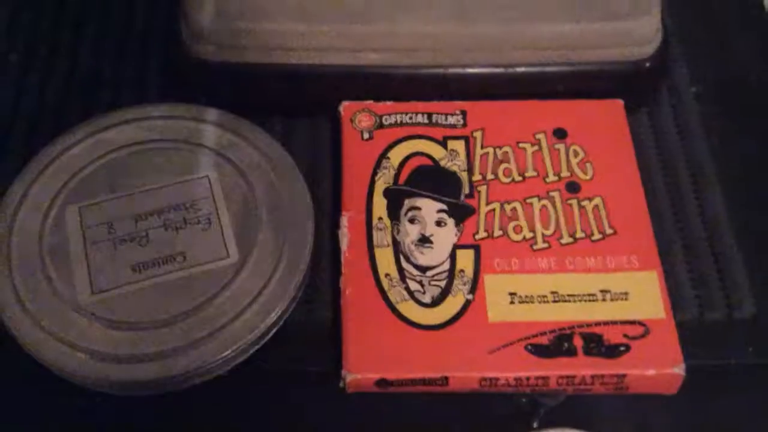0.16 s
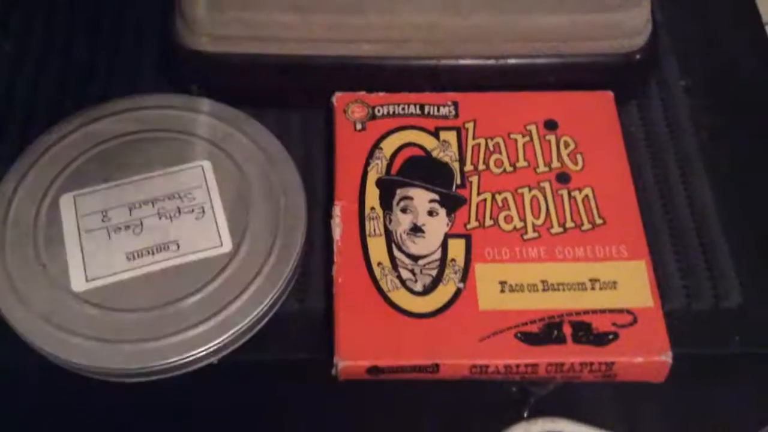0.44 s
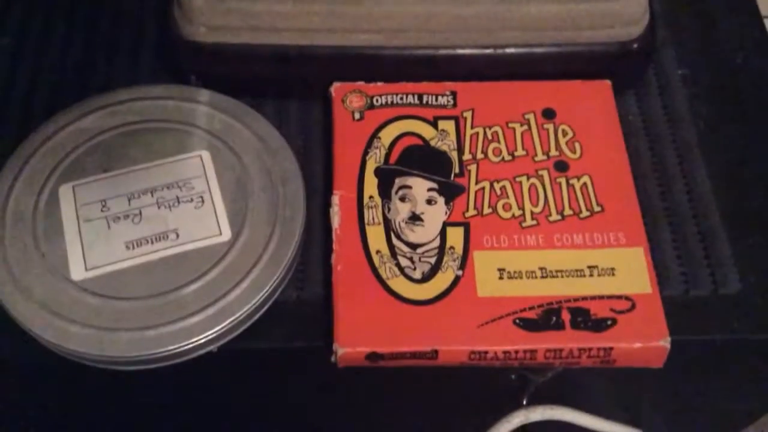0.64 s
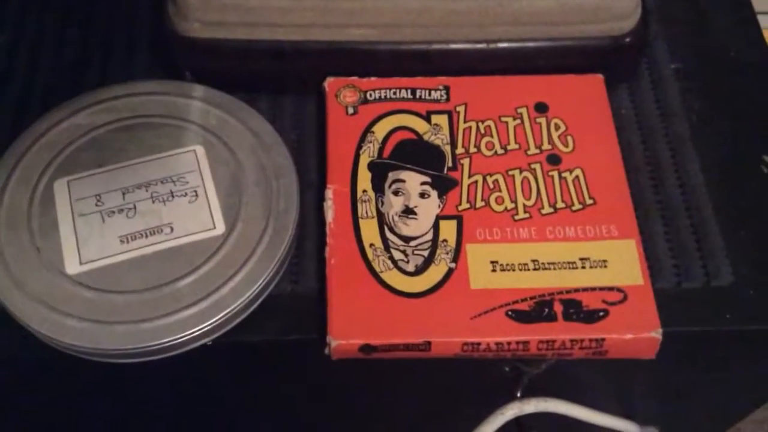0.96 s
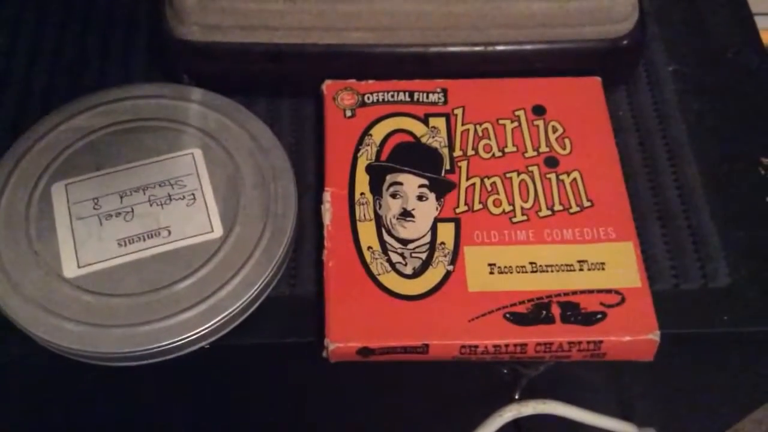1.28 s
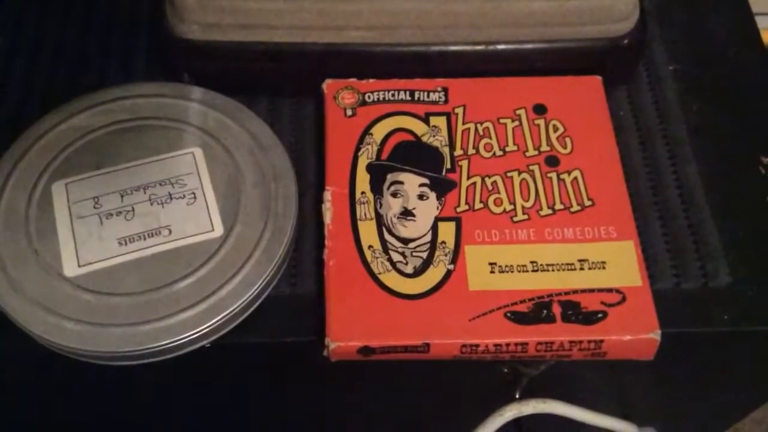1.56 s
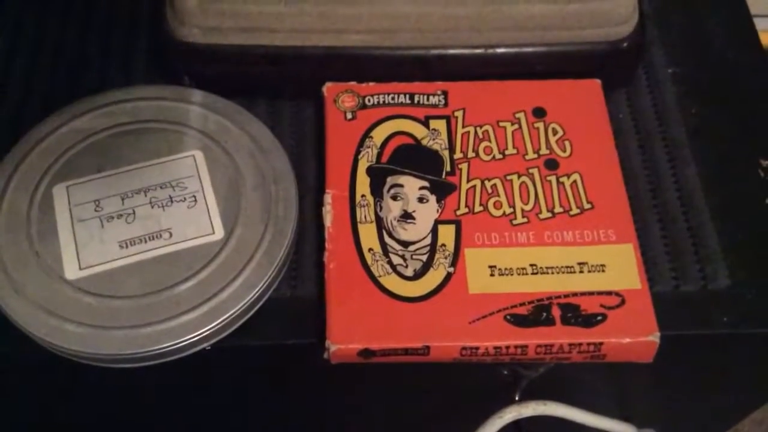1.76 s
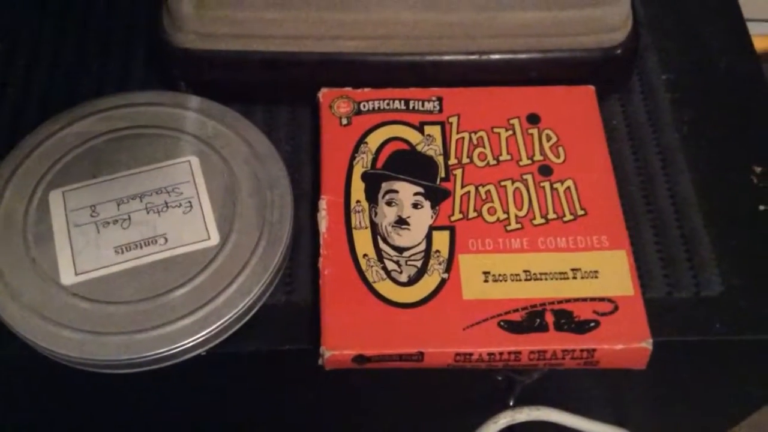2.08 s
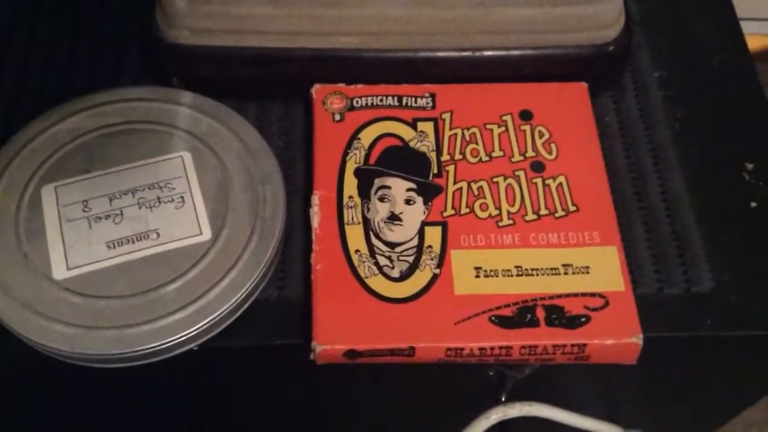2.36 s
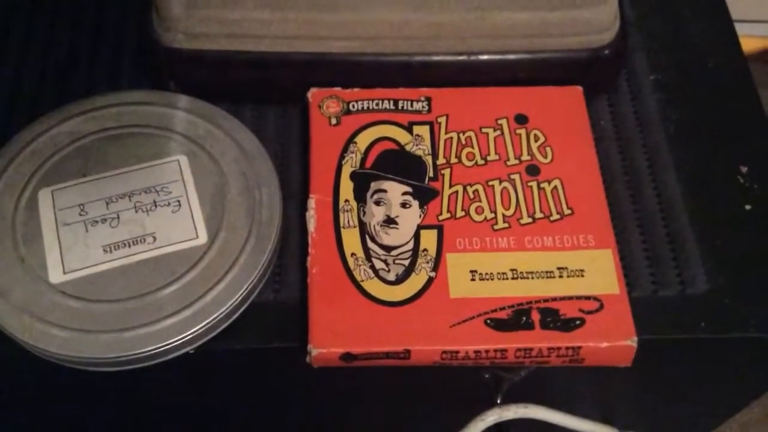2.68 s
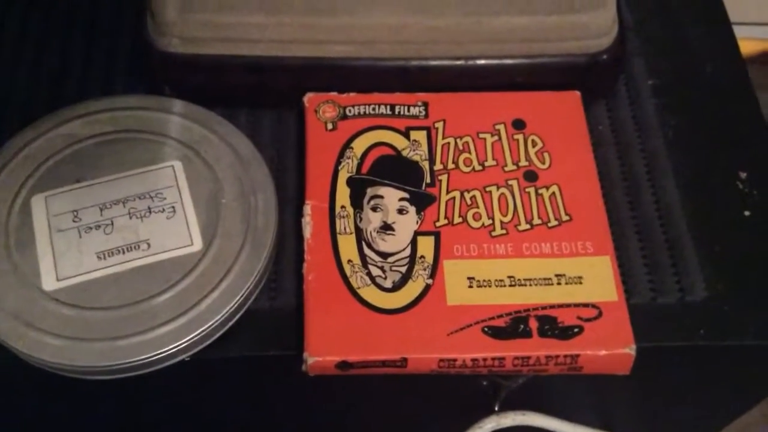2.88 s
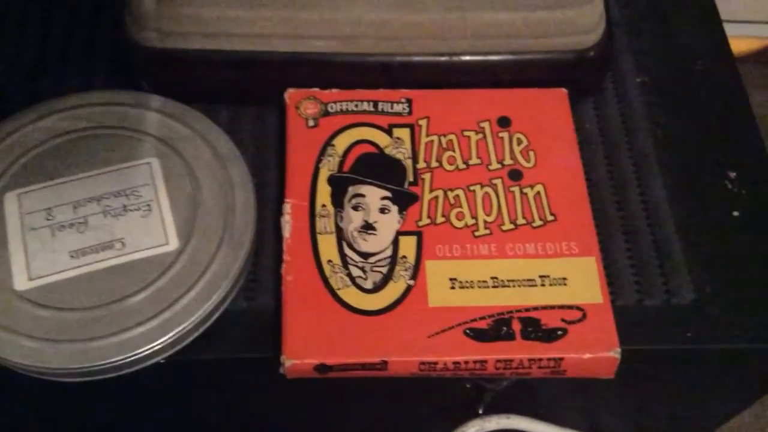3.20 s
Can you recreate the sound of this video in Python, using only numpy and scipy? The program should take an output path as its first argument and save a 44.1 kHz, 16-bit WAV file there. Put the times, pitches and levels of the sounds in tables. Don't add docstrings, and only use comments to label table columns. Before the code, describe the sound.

Rapid, steady metallic clatter of a film projector, with faint gear whine and blower air behind.

```python
import sys
import numpy as np
from scipy import signal
from scipy.fft import rfft, irfft
from scipy.io import wavfile
from scipy.ndimage import uniform_filter1d

SR = 44100
rng = np.random.default_rng(int(sys.argv[2]) if len(sys.argv) > 2 else 0)


def inscribe(sig):
    pcm = np.round(np.clip(np.atleast_2d(sig).T, -1, 1) * 32767)
    wavfile.write(sys.argv[1], SR, pcm.astype(np.int16))


def volts(x):
    e = np.asarray(x, float) / 20
    return 10 ** e


N = 147294

# t/s, film frames pulled so far
SHAFT_TURN = [(0.1351, 0), (0.339, 5), (0.5434, 10), (0.7471, 15), (0.951, 20), (1.1548, 25), (1.3571, 30),
              (1.5589, 35), (1.7618, 40), (1.9642, 45), (2.1671, 50), (2.3707, 55), (2.5747, 60),
              (2.7779, 65), (2.9811, 70), (3.1845, 75), (3.306, 78)]
# t/s, level/dB
CLAW_FORCE = [(.13, -32), (.3, -36.5), (.55, -35), (1.0, -36.5), (1.3, -35.5), (1.46, -38), (1.65, -37.5),
              (1.82, -33.5), (2.05, -36.5), (2.3, -35), (2.6, -34.5), (2.9, -36), (3.15, -33.5), (3.3, -33)]
# f/Hz, level/dB, time to fall 60 dB/s, delay/s
CLAW_MODES = [(9300, 2, .0047, 0), (9800, -3, .0035, 0), (8350, -6, .011, .0002),
              (14800, -12.5, .004, -.0003), (14700, -12.5, .006, .0007), (15600, -13.5, .005, .0005),
              (12800, -15, .005, -.0003), (16200, -19, .004, 0)]
# f/Hz, level/dB, time to fall 60 dB/s, delay/s
GATE_MODES = [(2950, -6.5, .02, -.0002), (2790, -12, .03, 0), (4000, -9, .013, .0008),
              (4450, -14, .015, .001), (5100, -9.5, .016, .0008), (5950, -12, .013, 0),
              (6600, -15, .011, .0003)]
# f/Hz, level per Hz/dB
RATTLE_COLOUR = [(1500, -6), (2500, 2), (5000, -4), (7500, -1.5), (9500, -2), (12000, -4), (14800, -7),
                 (16800, -7)]
# f/Hz, level/dB, width of wavering/Hz, steady share
STEADY_TONES = [
    (61.3, -61.5, 3, .92),
    (100.1, -70, 1, .9),
    (288.3, -61, 3, .85),
    (503, -65, 4, .7),
    (1878, -65, 6, .6),
    (1992, -65, 8, .6),
]
# f/Hz, level/dB
GEAR_MESH = [(890, -51.5), (816, -60), (914.5, -58), (1036.6, -61), (964, -64), (841, -64)]
# t/s, gear level/dB, fan blade level/dB
WHINE_LOAD = [(.13, -8, -2), (.4, 2.5, -3.5), (.8, 4.5, 1.5), (1.1, -2.5, -5), (1.45, -2, -23),
              (1.75, -3, -6), (2.05, 3.5, -2), (2.5, 1.5, 3.5), (2.8, 1.5, -3), (3.05, 1, -23),
              (3.33, -1.5, 0)]
# f/Hz, level per Hz/dB
RUMBLE_COLOUR = [(15, -48), (25, -33.5), (59, -16), (108, -13.5), (429, -10.5), (579, -8), (728, -8.5),
                 (900, -2.5), (1700, -15.5), (2210, -43), (3740, -120)]
# f/Hz, level per Hz/dB
RUSH_COLOUR = [(880, -18), (1500, -9), (2260, 2.5), (2600, -3), (7620, -12.5), (9500, -15), (12200, -14.5),
               (15100, -14.5), (16500, -43)]
# f/Hz, width/Hz, boost/dB
HOUSING_MODES = [(82, 34, -11), (121, 24, -8.5), (159, 270, 4), (249, 26, -6), (595, 280, 3), (906, 27, 4),
                 (1190, 70, 4), (1888, 190, 5.5), (2267, 27, 7.5), (2740, 40, 5), (4425, 580, 4.5),
                 (7600, 210, -8.5), (11530, 610, 7), (11900, 400, -9)]
# t/s, share
TREBLE_LOSS = [(0, .1), (1.55, .1), (1.7, .42), (2.1, .42), (2.25, .25), (2.65, .35), (3.0, .6),
               (3.34, .45)]
# f/Hz, weight
LOSS_PLACES = [(4800, 0), (5800, .4), (7500, .4), (9000, .15), (11000, .3), (12300, 1), (16000, .8)]


def claw():
    rise_s, rebound_s, rebound_db = .0006, .0122, -22
    usual_db, follow = -33, .5
    turn_s, turn_frame = np.transpose(SHAFT_TURN)
    frame = np.arange(turn_frame[-1] + 1)
    hit_s = np.interp(frame, turn_frame, turn_s) - rise_s
    modes = CLAW_MODES + GATE_MODES
    luck = rng.standard_normal((len(frame), 1 + 2 * len(modes)))
    force_db = np.interp(hit_s, *np.transpose(CLAW_FORCE)) + .8 * luck[:, 0]
    force_db += -1.8 * (frame % 2)
    force_db += -10 * (frame == 35)

    t = np.arange(4000) / SR
    thud = housing_thud(t)
    hz, mode_db, t60, delay = np.transpose(modes)[:, :, None]
    age = np.maximum(t - delay, 0)
    rise = np.sin(np.pi / 2 * np.minimum(age / rise_s, 1)) ** 2
    fall_db = -60 * np.maximum(age - rise_s, 0) / t60

    hits, rattle_starts = np.zeros(N + 4000), np.zeros(N)
    for i, n in enumerate(np.round(hit_s * SR).astype(int)):
        level_luck, pitch_luck = luck[i, 1::2, None], luck[i, 2::2, None]
        change_db = force_db[i] - usual_db
        level_db = usual_db + np.where(hz > 8000, 1, follow) * change_db + mode_db + 1.6 * level_luck
        ringing = np.cos(2 * np.pi * hz * (1 + .006 * pitch_luck) * (age - rise_s))
        snap = (rise * volts(level_db + fall_db) * ringing).sum(0)
        snap = snap + volts(rebound_db) * np.roll(snap, round(rebound_s * SR))
        hits[n:n + 4000] += volts(.5) * snap + volts(-28.5) * thud
        rattle_starts[n] = volts(usual_db + follow * change_db)
    return hits[:N] + rattle(rattle_starts, t)


def housing_thud(t):
    start_s, length_s = .0032, .0083
    progress = np.clip((t - start_s) / length_s, 0, 1)
    swell = volts(-12) * np.sin(np.pi * progress) ** 1.26
    ring = volts(-20 - 60 * t / .14) * progress
    return (swell + ring) * np.sin(2 * np.pi * 1110 * t)


def rattle(starts, t):
    shape = np.minimum(t / .0026, 1) * volts(-10.5 - 60 * t / .13)
    loudness = signal.oaconvolve(starts, shape)[:N]
    return loudness * coloured(lambda f: read(RATTLE_COLOUR, f) + housing_db(f), N)


def whines():
    t = np.arange(N) / SR
    load_s, gear_db, blade_db = np.transpose(WHINE_LOAD)

    def tone(hz, db):
        return volts(db + 2.5) * np.exp(2j * np.pi * (hz * t + rng.random()))

    out = sum(tone(hz, db) * waver(width, steady) for hz, db, width, steady in STEADY_TONES)
    out += volts(np.interp(t, load_s, blade_db)) * tone(576, -54.5) * waver(2.8, 1.0)
    gears = sum(tone(hz, db) for hz, db in GEAR_MESH)
    out += volts(np.interp(t, load_s, gear_db)) * gears * waver(5, .85)
    return out.real


def waver(width_hz, steady):
    noise = rng.standard_normal(N) + 1j * rng.standard_normal(N)
    slowness = 1 + (np.fft.fftfreq(N, 1 / SR) / width_hz) ** 2
    drift = np.fft.ifft(np.fft.fft(noise) / slowness)
    drift = drift / np.sqrt(np.mean(abs(drift) ** 2))
    return steady + np.sqrt(1 - min(steady, 1) ** 2) * drift


def blower():
    rumble_db, rush_db, patchy_db, flicker_db = -44, -47.5, 1.0, 1.28

    def low_colour(f):
        slope = -30 * np.clip(np.log2(f / 1700 + 1e-9), 0, 3)
        return read(RUMBLE_COLOUR, f) + housing_db(f) + slope - 20 * (f < 22)

    def high_colour(f):
        slope = 30 * np.clip(np.log2(f / 1500 + 1e-9), -3, 0)
        return read(RUSH_COLOUR, f) + housing_db(f) + slope

    air = volts(rumble_db) * coloured(low_colour, N) + volts(rush_db) * coloured(high_colour, N)
    z = signal.stft(air, nperseg=512, noverlap=384)[2]
    patches = uniform_filter1d(rng.standard_normal(z.shape), 6, 0)
    patches = evened(uniform_filter1d(patches, 14, 1))
    flicker = evened(uniform_filter1d(rng.standard_normal(z.shape[1]), 3))
    z = z * volts(patchy_db * patches + flicker_db * flicker)
    return signal.istft(z, nperseg=512, noverlap=384)[1][:N]


def housing_db(hz):
    return sum(db / (1 + (2 * (hz - f) / width) ** 2) for f, width, db in HOUSING_MODES)


def coloured(db_of_hz, count):
    spectrum = rfft(rng.standard_normal(count)) * volts(db_of_hz(np.fft.rfftfreq(count, 1 / SR)))
    return evened(irfft(spectrum, count))


def read(points, hz):
    f, value = np.transpose(points)
    return np.interp(np.log(hz + 1), np.log(f + 1), value)


def evened(x):
    return x / np.sqrt(np.mean(x ** 2) + 1e-20)


def scene():
    return (claw() + whines() + blower())[None]


def thin_treble(x):
    hz, t, z = signal.stft(x, SR, nperseg=512, noverlap=384)
    power = uniform_filter1d(abs(z[0]) ** 2, 40, 0)
    quiet = power < 1.2 * np.median(power, 1, keepdims=True)
    luck = rng.random((len(hz) // 3 + 2, len(t) // 4 + 1)).repeat(4, 1)[:, :len(t)]
    loss = 2.5 * luck[-1] ** 1.5 * np.interp(t, *np.transpose(TREBLE_LOSS))
    chance = read(LOSS_PLACES, hz)[:, None] * loss
    lost = quiet & (luck.repeat(3, 0)[:len(hz)] < chance)
    return signal.istft(z * np.where(lost, .02, 1), SR, nperseg=512, noverlap=384)[1][:, :N]


def limit_top(x):
    low, full = (signal.firwin(2047, hz, window=("kaiser", 9), fs=SR) for hz in (15800, 16550))
    top = signal.oaconvolve(x, (full - low)[None], "same")
    power = abs(uniform_filter1d(top ** 2, 200))
    loss = np.interp(np.arange(N) / SR, *np.transpose(TREBLE_LOSS))
    opens_at = volts(2 * 15.5 - 16 * loss) * np.median(power)
    gate = uniform_filter1d(1. * (power > opens_at), 300)
    return signal.oaconvolve(x, low[None], "same") + volts(-8) * gate * top


def low_pass(x):
    return signal.sosfilt(signal.butter(12, 16820, fs=SR, output="sos"), x)


def record(dry):
    start_s, fade_s = .1205, .00071
    opened = dry * np.clip((np.arange(N) / SR - start_s) / fade_s, 0, 1)
    mix = thin_treble(limit_top(opened))
    return low_pass(mix)


dry = scene()
out = record(dry)
inscribe(out)
```